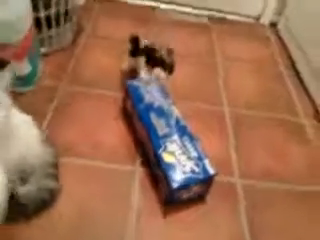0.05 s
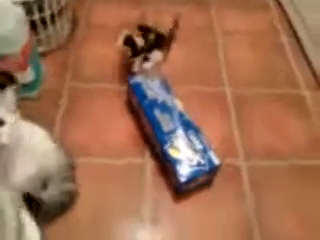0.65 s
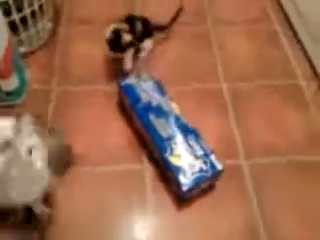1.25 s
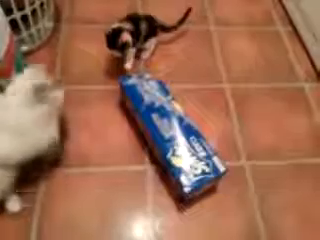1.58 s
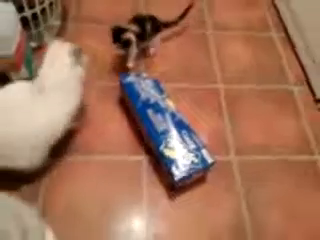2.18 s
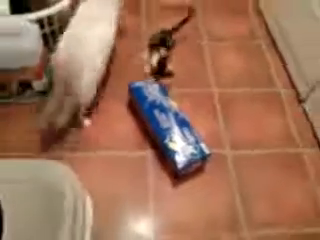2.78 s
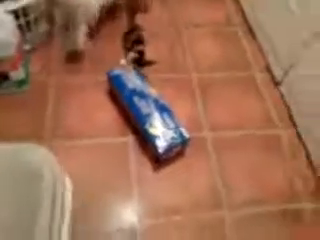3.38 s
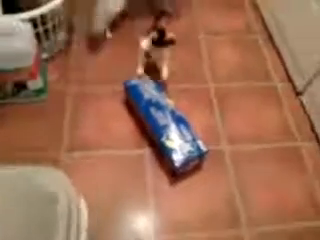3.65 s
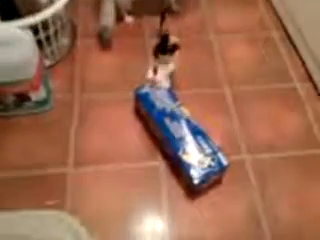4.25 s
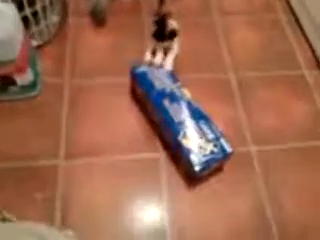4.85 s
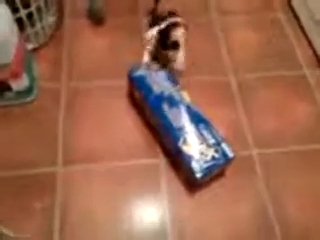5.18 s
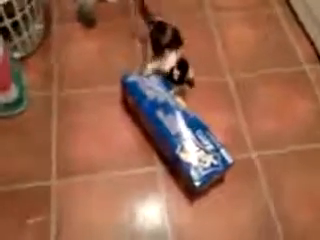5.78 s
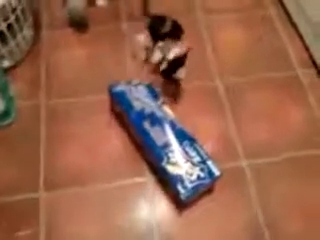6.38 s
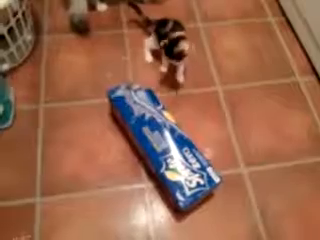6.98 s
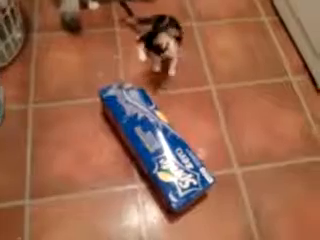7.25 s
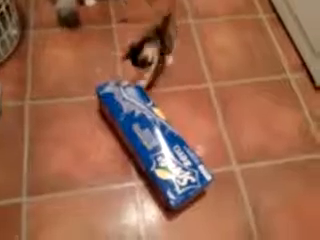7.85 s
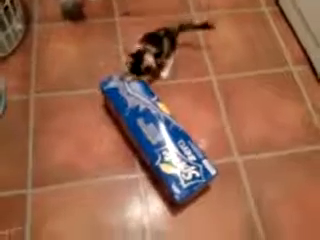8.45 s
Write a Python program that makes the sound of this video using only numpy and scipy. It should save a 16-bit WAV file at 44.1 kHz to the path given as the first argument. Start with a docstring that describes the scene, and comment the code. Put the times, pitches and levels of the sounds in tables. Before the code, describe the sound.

Claws scrape and snap on a hollow cardboard box as it slides and bumps over tile, above a low appliance hum.

```python
"""A kitten claws and bats an empty cardboard box on a tiled floor.
Claws stick and slip over the card; the hollow box slides, booms under each blow and thumps down,
and its flaps snap and rustle back. A bigger cat shuffles past, with a few faint squeaks and ticks.
The small hard room rings after each burst, over a low appliance hum and microphone hiss."""
import sys
import numpy as np
from scipy import signal
from scipy.fft import rfft, irfft
from scipy.io import wavfile
from scipy.ndimage import uniform_filter1d

SR = 44100
rng = np.random.default_rng(int(sys.argv[2]) if len(sys.argv) > 2 else 0)


def to_wav(sig):
    """Store sig (one row per channel, or 1-D mono) as 16-bit WAV at the path in sys.argv[1].

    Samples outside -1..1 are clipped; the rate is SR.
    """
    pcm = np.clip(np.atleast_2d(sig), -1, 1) * 32767
    pcm = np.round(pcm).astype(np.int16)
    wavfile.write(sys.argv[1], SR, pcm.T)  # frames by channels


N = 383669
HZ = np.fft.rfftfreq(N, 1 / SR)

# Cue levels are set ahead of the mix gains. Likeness is the correlation of left and right.
# Colour of the room tone: frequency_hz, level_db
AIR_COLOUR = [(20, -9), (44, -8), (88, -0.5), (130, -19), (180, 1), (220, -8), (250, -6), (315, -10.5),
              (465, -11), (530, -15.5), (1000, -27.5), (4000, -38.5), (10000, -29.5), (16000, -34.5)]
# Stereo image of the room tone: frequency_hz, likeness
AIR_LIKENESS = [(60, 0.63), (290, 0.78), (640, 0.23), (1400, 0.031), (3000, 0.059), (15000, 0.056)]
# Fader ride on the hiss, sinking in the pauses: time_s, gain_db
HISS_RIDE = [(1.4, 10.5), (1.65, 6), (1.9, 9), (4.1, 11.5), (6.301, 12.5), (6.498, 5), (6.75, 3),
             (6.9, 3.5), (7.2, 10.5)]
# Partials of the appliance hum: pitch_hz, level_db
HUM_PARTIALS = [(188.4, -82), (253.0, -73.5), (339.1, -78), (425.3, -76), (468.3, -77)]
# Strokes of claw on card and box on tile: crest_s, length_s, force_db, lean_db
# Positive lean rides the claw tips; negative lean digs into the box.
STROKES = [(0.045, 0.081, -51.5, 1), (0.211, 0.2, -47.5, -3.5), (0.306, 0.054, -51, 3.5),
           (0.629, 0.048, -60.0, -7), (0.737, 0.079, -66, -4.5), (0.874, 0.098, -51, 3),
           (0.935, 0.12, -43, 2), (1.164, 0.057, -73, 10), (1.3, 0.089, -60.5, -6.5),
           (3.088, 0.12, -57.5, -1), (3.177, 0.14, -40.5, 5.5), (3.348, 0.18, -42, -2),
           (3.4, 0.06, -28, -3.5), (3.484, 0.17, -43, -1), (3.587, 0.077, -49, -1), (3.827, 0.29, -61, 9.5),
           (4.229, 0.086, -42.5, -1.0), (4.355, 0.21, -39, -1), (4.533, 0.11, -30.5, 1.5),
           (4.663, 0.22, -42.5, -2.5), (4.905, 0.15, -54.5, 6), (5.013, 0.14, -55, 6.5),
           (5.086, 0.11, -34, -5.5), (5.195, 0.11, -39.5, 3.5), (5.284, 0.085, -47, -7.5),
           (5.442, 0.09, -45.5, -2.5), (5.691, 0.078, -53.5, 6), (5.888, 0.11, -49.0, -3),
           (6.011, 0.2, -49, 2.5), (6.286, 0.14, -45, 0), (7.11, 0.09, -75, 3), (7.34, 0.19, -63, 7.5),
           (7.907, 0.069, -36, 7.5), (7.95, 0.11, -34.5, 2), (8.002, 0.13, -37, -5),
           (8.04, 0.057, -32.5, -0.5), (8.087, 0.17, -30.5, 2), (8.212, 0.088, -41, 0),
           (8.312, 0.064, -55.5, 4.5), (8.497, 0.075, -58.5, 4), (8.602, 0.16, -58, 5)]
# Air and panel modes of the box: pitch_hz, level_db, t60_s
BOX_MODES = [(121.9, -8, 0.16), (219, -7, 0.12), (257, -13, 0.048), (340, -5, 0.073), (438.8, -4, 0.072),
             (502.4, 8, 0.019), (563, -9, 0.033), (637, -0.5, 0.06), (795, -2.5, 0.08), (1073, -14, 0.13),
             (1222, -24, .06), (1400, -19, 0.053), (1430, -0.5, 0.057), (1820, -16, 0.077)]
# Colour of cardboard: frequency_hz, level_db
CARD_COLOUR = [(40, -25), (120, -7.5), (230, -17), (330, -10.5), (600, -7.5), (900, -11.5), (1400, -14),
               (2000, -14), (2500, -19), (3200, -14), (5500, -17), (8900, -14.5), (13000, -23),
               (16000, -30.5)]
# Hollow blows of paw on box and box on tile: start_s, level_db, centre_hz, room_send_db
BLOWS = [(.013, -33.5, 405, 4.5), (0.129, -31.5, 517, -7), (.171, -17, 414.6, 1), (0.624, -45, 268, -1),
         (2.187, -46.5, 207, -1.5), (2.638, -44.5, 205, 1), (2.891, -48, 221, -2), (3.166, -37, 230, -5),
         (3.305, -19.5, 210, -3), (3.39, -19, 235, 2), (4.507, -10.5, 512, 2.5), (4.587, -20, 564, -7),
         (4.625, -9, 513, -6), (4.711, -20, 530, -1), (4.977, -22, 475, 2), (5.049, -9.5, 556, 2),
         (5.091, -12, 516, -4), (5.099, -28, 80, -4), (5.128, -21, 520, -0.5), (5.282, -38, 520, 0),
         (5.388, -26, 510, -2), (5.843, -28, 386, -1), (6.036, -21.5, 466, -11.5), (6.252, -24, 556, -12),
         (7.986, -16, 346, -3), (8.066, -1.5, 616, -6.5), (8.068, -13.5, 320, -0.5), (8.07, -18.5, 125, -6),
         (8.093, -17, 565, 2.5), (8.221, -33, 141, -5.5)]
# The box dropping back on the tile: start_s, level_db, centre_hz
LANDINGS = [(.014, -46, 140), (.174, -29.5, 200), (.875, -49, 130), (3.392, -29, 170), (4.51, -40, 120),
            (4.627, -37, 120), (5.092, -29, 55), (5.285, -44, 80), (8.065, -26, 120), (8.22, -38, 130)]
# Snaps of claws and flaps: start_s, level_db, centre_hz, give_way_s
CARD_SNAPS = [(0.171, -17, 1320, 0.00035), (0.875, -19.5, 2960, 0.00025), (2.641, -33, 5000, 0.00018),
              (3.105, -19.5, 8000, .0002), (3.305, -31.5, 2150, .0003), (3.361, -11.5, 3680, .0003),
              (3.394, -18, 3160, .0003), (3.943, -26.5, 2330, 0.00063), (4.199, -15.5, 1730, 0.0012),
              (4.296, -18, 2090, .002), (4.506, -13.5, 2370, .002), (4.584, -12.5, 4630, 0.00083),
              (4.625, -17, 4140, 0.00037), (4.707, -13, 5260, 0.0013), (4.914, -26.5, 10900, 0.0002),
              (5.051, -7, 4200, 0.0021), (5.385, -17, 1820, 0.00093), (5.517, -36.5, 6510, 0.00035),
              (5.842, -21, 1800, 0.00068), (5.967, -24, 2370, 0.0018), (6.222, -21.5, 1750, 0.0034),
              (6.294, -17.5, 2150, 0.0041), (7.986, -12, 1560, 0.00016), (8.022, -8, 1900, 0.0037),
              (8.063, -10, 1860, 0.00038), (8.476, -39, 4060, 0.00034)]
# Faint thin squeaks: start_s, length_s, first_hz, last_hz, width_hz, level_db
SQUEAK_GLIDES = [(.28, .52, 3240, 3130, 170, -70.5), (2.738, .23, 2965, 2700, 750, -66.5),
                 (2.87, .22, 2140, 2010, 260, -68.5), (7.059, .11, 1330, 1250, 260, -70.5),
                 (7.19, .06, 897, 780, 350, -66)]
# Small, close, dry taps: start_s, level_db, centre_hz, give_way_s
CLOSE_TICKS = [(1.07, -49, 2600, .0003), (2.55, -53, 6500, .0002)]
# Steps of the bigger cat: start_s, length_s, level_db
CAT_STEPS = [(1.92, 0.21, -71.5), (2.069, .2, -67), (2.223, 0.22, -75)]
# Colour of fur and pads on tile: frequency_hz, level_db
FUR_COLOUR = [(500, -16), (1000, -3), (1650, 0), (2300, 0), (2800, -11), (3350, -2), (4200, -14),
              (5100, -5), (6500, -27), (16000, -40)]
# Decay of the room: frequency_hz, t60_s
ROOM_DECAY = [(100, 0.32), (400, 0.29), (1000, 0.27), (3000, 0.28), (8000, 0.24), (15000, 0.33)]
# Stereo image of the reverb: frequency_hz, likeness
ROOM_LIKENESS = [(100, 0.85), (300, 0.91), (550, 0.53), (1000, -.1), (2000, -0.17), (5000, 0.016)]
# Pan of the action, band by band: frequency_hz, left_minus_right_db
PAN = [(100, -0.5), (250, 0), (500, -2.5), (1100, -4), (2000, -6.5), (4000, -1.5), (12000, 0.5)]


def amp(db):
    """Decibels to gain."""
    return 10 ** (np.asarray(db) / 20)


def unit_rms(x):
    """Scales a signal to rms 1."""
    return x / np.sqrt(np.mean(x ** 2) + 1e-20)


def curve(points, hz):
    """Reads a table along a log-frequency axis."""
    knots_hz, values = np.transpose(points)
    return np.interp(np.log(hz + 1), np.log(knots_hz + 1), values)


def add(mix, start_s, sound):
    """Lays a sound into the mix."""
    part = mix[max(round(start_s * SR), 0):][:len(sound)]
    part += sound[:len(part)]


def eq(x, gain):
    """Filters a signal by a gain per frequency."""
    return irfft(rfft(x) * gain, x.shape[-1])


def hump(hz, centre_hz, octaves):
    """A soft band-pass curve."""
    return 1 / np.sqrt(1 + (np.log2((hz + 1) / centre_hz) / octaves) ** 4)


def stereo_pair(a, b, likeness):
    """Blends two unrelated spectra into a left and right of the given likeness."""
    mid, side = np.sqrt((1 + likeness) / 2) * a, np.sqrt((1 - likeness) / 2) * b
    return np.array([mid + side, mid - side])


def wander(size, span):
    """Random drift at rms 1, smoothed over span points."""
    return unit_rms(uniform_filter1d(rng.standard_normal(size), size=span))


def room_tone(air_db=-64, crossover_hz=700, waver_hz=1.8):
    """The bed: room rumble, microphone hiss and the wavering hum of an appliance."""
    a, b = rfft(rng.standard_normal((2, N)))
    spectrum = stereo_pair(a, b, curve(AIR_LIKENESS, HZ)) * amp(curve(AIR_COLOUR, HZ))
    wash = unit_rms(irfft(spectrum, N))
    rumble = eq(wash, 1 / (1 + (HZ / crossover_hz) ** 4))
    hiss = (wash - rumble) * amp(np.interp(np.arange(N) / SR, *np.transpose(HISS_RIDE)))
    hum = np.zeros(N)
    for pitch_hz, level_db in HUM_PARTIALS:
        cycles = np.cumsum(pitch_hz + waver_hz * wander(N, 4000)) / SR
        hum += amp(level_db) * np.sqrt(2) * np.sin(2 * np.pi * cycles)
    return amp(air_db) * (rumble + hiss) + hum


def slips(size, per_s, spread_db):
    """Stick and slip: a spray of tiny clicks, some larger than the rest."""
    height = amp(spread_db * np.minimum(rng.exponential(1, size), 3))
    return height * rng.choice([-1., 1.], size) * (rng.random(size) < per_s / SR)


def box_ring(centre_hz, octaves, scatter_db, detune=.03):
    """The box rings once: the blow's place and softness weight the modes, the paw's weight detunes them."""
    t = np.arange(SR // 4) / SR
    hz, level_db, t60_s = np.transpose(BOX_MODES)[:, :, None]
    hz = hz * (1 + detune * rng.standard_normal(hz.shape))
    weight = hump(hz, centre_hz, octaves) * amp(scatter_db * rng.standard_normal(hz.shape))
    modes = np.sin(2 * np.pi * (hz * t + rng.random(hz.shape)))
    return (weight * amp(level_db - 60 * t / t60_s) * modes).sum(0)


def scrape(swell_s, fade_s, boom_hz, boom_db, rasp_db, fizz_db, edge_db=-18.5, judder_db=4, spot_db=2):
    """One stroke, cresting mid-buffer: slips boom in the box, rasp on the card, fizz at the claw tips."""
    size = SR // 2
    t, hz = (np.arange(size) - size // 2) / SR, np.fft.rfftfreq(size, 1 / SR)
    swell_db = edge_db * (t / np.where(t < 0, swell_s, fade_s)) ** 2
    force = amp(swell_db + judder_db * wander(size, 260))  # the claw catches and lets go
    card = amp(curve(CARD_COLOUR, hz) + spot_db * wander(len(hz), 220))  # each spot has its resonances
    low, high = 1 / (1 + (hz / 900) ** 6), 1 - 1 / (1 + (hz / 4000) ** 6)
    middle = (1 - low) * (1 - high)
    drag = slips(size, per_s=1500, spread_db=3.96)
    ring = unit_rms(signal.oaconvolve(drag, box_ring(boom_hz, octaves=.76, scatter_db=.85))[:size])
    rumble = unit_rms(eq(drag, card * np.sqrt(low) * hump(hz, boom_hz, octaves=1.04)))
    boom = unit_rms(.43 * ring + .57 * rumble)
    rasp = unit_rms(eq(slips(size, per_s=2200, spread_db=.5), card * np.sqrt(middle)))
    fizz = unit_rms(eq(slips(size, per_s=6000, spread_db=5.5), card * np.sqrt(high)))
    return force * (amp(boom_db) * boom + amp(rasp_db) * rasp + amp(fizz_db) * fizz)


def card_friction(firm_db=-35, firm_hz=394, octaves_per_db=.02, rustle_rise_s=.009, rustle_fade_s=.037):
    """Claws and tile scrape the card, and it rustles as it springs back from each snap."""
    out = np.zeros(N + SR)  # one second of pre-roll
    for crest_s, length_s, force_db, lean_db in STROKES:
        boom_hz = firm_hz * 2 ** (octaves_per_db * (force_db - firm_db))  # a harder push booms higher
        rasp_db = force_db + 3 - abs(lean_db)  # a level claw rasps most
        stroke = scrape(.58 * length_s, .42 * length_s, boom_hz,
                        boom_db=force_db - lean_db, rasp_db=rasp_db, fizz_db=force_db + lean_db)
        add(out, 1 + crest_s - len(stroke) / 2 / SR, stroke)
    for start_s, snap_db, centre_hz, _ in CARD_SNAPS:
        lean_db = 3 * np.log2(centre_hz / 3600)  # a bright snap leaves fizz, a dull one some boom
        rustle = scrape(rustle_rise_s, rustle_fade_s, firm_hz, boom_db=snap_db - 29.5 - lean_db,
                        rasp_db=snap_db - 26, fizz_db=snap_db - 27 + lean_db)
        add(out, 1 + start_s + rustle_rise_s - len(rustle) / 2 / SR, rustle)
    return out[SR:]


def crackle(centre_hz, octaves, decay_s):
    """Tiny fractures in card, played as a fast-dying band of noise."""
    t = np.arange(SR // 4) / SR
    hz = np.fft.rfftfreq(len(t), 1 / SR)
    burst = eq(rng.standard_normal(len(t)), hump(hz, centre_hz, octaves) * amp(curve(CARD_COLOUR, hz)))
    return unit_rms(burst) * np.exp(-t / decay_s)


def even_attack(x):
    """Scales a hit so its first 5 ms have rms 0.5."""
    return x / (2 * np.sqrt(np.mean(x[:SR // 200] ** 2)))


def bumps(chatter_cycles=2.5, panel_cycles=3.6, sag=.15, sag_s=.0052, attack_s=.0012):
    """Blows swing a panel, ring the hollow box and set loose flaps chattering: dry bus and room send."""
    direct, send = np.zeros((2, N))
    for start_s, level_db, hz, send_db in BLOWS:
        ring = box_ring(hz, octaves=.36, scatter_db=1.4)
        chatter = crackle(hz, octaves=1, decay_s=chatter_cycles / hz)
        t = np.arange(len(ring)) / SR
        cycles = np.cumsum(hz * (1 + sag * np.exp(-t / sag_s))) / SR  # starts sharp, sinks as it relaxes
        panel = np.sin(2 * np.pi * cycles) * np.exp(-cycles / panel_cycles)
        body = amp(-3) * (panel + even_attack(ring)) + amp(-3.5) * even_attack(chatter)
        blow = amp(level_db) * body * (1 - np.exp(-t / attack_s))
        add(direct, start_s, blow)
        add(send, start_s, amp(send_db) * blow)
    return direct, send


def thumps(rise_s=.003, fade_s=.026):
    """The weight of the box lands on the tile: a short, dull shudder without a ring."""
    out, t = np.zeros(N), np.arange(SR // 4) / SR
    hz = np.fft.rfftfreq(len(t), 1 / SR)
    envelope = (1 - np.exp(-t / rise_s)) * np.exp(-t / fade_s)
    for start_s, level_db, centre_hz in LANDINGS:
        shudder = eq(rng.standard_normal(len(t)), hump(hz, centre_hz, octaves=.7) ** 2)
        add(out, start_s, amp(level_db) * unit_rms(shudder) * envelope)
    return out


def snaps(cues, octaves, tail_s):
    """A claw or crease lets go: a crack and a crackling tail, or a soft crunch if it gives way slowly."""
    out = np.zeros(N)
    for start_s, level_db, centre_hz, give_way_s in cues:
        tail = crackle(centre_hz, octaves, decay_s=tail_s + give_way_s)
        crack = amp(1) * crackle(centre_hz, octaves, decay_s=.0005)
        onset = 1 - np.exp(-np.arange(len(tail)) / SR / give_way_s)
        add(out, start_s, amp(level_db) * (crack + tail) * onset)
    return out


def arch(length_s):
    """A smooth swell and fade."""
    return np.sin(np.linspace(0, np.pi, round(length_s * SR)))


def squeaks():
    """Thin, fuzzy tones that sink a little as they swell and fade."""
    out = np.zeros(N)
    for start_s, length_s, first_hz, last_hz, width_hz, level_db in SQUEAK_GLIDES:
        swell = arch(length_s)
        offset_hz = np.fft.fftfreq(len(swell), 1 / SR)
        a, b = rng.standard_normal((2, len(swell)))
        fuzz = np.fft.ifft((a + 1j * b) / (1 + (2 * offset_hz / width_hz) ** 2))
        cycles = np.cumsum(np.linspace(first_hz, last_hz, len(swell))) / SR
        tone = (fuzz * np.exp(2j * np.pi * cycles)).real  # narrow noise riding the glide
        add(out, start_s, amp(level_db) * swell * unit_rms(tone))
    return out


def shuffles():
    """The bigger cat's fur and soft pads brush over the tile."""
    out = np.zeros(N)
    for start_s, length_s, level_db in CAT_STEPS:
        swell = arch(length_s)
        hz = np.fft.rfftfreq(len(swell), 1 / SR)
        brush = eq(slips(len(swell), per_s=1800, spread_db=3), amp(curve(FUR_COLOUR, hz)))
        add(out, start_s, amp(level_db) * swell * unit_rms(brush))
    return out


def echoes(per_s=4000, early_s=.022):
    """Dense stereo reflections off tile and walls, each band dying at its own speed."""
    taps = rng.standard_normal((2, SR // 2)) * (rng.random((2, SR // 2)) < per_s / SR)
    hz, frame_s, bands = signal.stft(taps, SR, nperseg=512)
    decay = amp(-60 * frame_s / curve(ROOM_DECAY, hz)[:, None])
    bands = stereo_pair(*bands, curve(ROOM_LIKENESS, hz)[:, None]) * decay
    tail = signal.istft(bands, SR, nperseg=512)[1]
    t = np.arange(tail.shape[1]) / SR
    onset = np.clip(t / .001 - .5, 0, 1)
    tail = tail * onset * (1 + np.exp(-t / early_s))  # floor and near walls answer first
    return tail / np.linalg.norm(tail[0])


def reverb(send, spots, blend_samples):
    """Sound leaves from ever-changing spots on the box, each with its own echo pattern."""
    shares = rng.standard_normal((spots, N))
    for _ in range(2):
        shares = uniform_filter1d(shares, size=blend_samples, axis=1)
    shares = shares / np.linalg.norm(shares, axis=0)
    return sum(signal.oaconvolve((share * send)[None], echoes(), axes=1)[:, :N] for share in shares)


def scene(low_cut_hz=70):
    """The play at the box, a little to the right, over the room tone."""
    friction = card_friction()
    bump, bump_send = bumps()
    snap = snaps(CARD_SNAPS, octaves=.96, tail_s=.0034)
    faint = squeaks() + shuffles()
    thump = thumps()
    ticks = snaps(CLOSE_TICKS, octaves=.65, tail_s=.0018)
    hits = amp(-3.5) * bump + amp(-2.5) * thump + amp(-11) * snap + amp(9) * ticks
    direct = amp(-6.5) * (friction + faint) + hits
    wet = reverb(amp(1) * friction + amp(-3) * snap + faint, spots=8, blend_samples=420)
    wet += reverb(amp(-1.5) * bump_send, spots=2, blend_samples=2200)
    stereo = np.array([np.roll(direct, 2), direct]) + wet  # the right side hears it first
    # A small box gives off little deep bass.
    low_cut = (HZ / low_cut_hz) ** 2 / np.sqrt(1 + (HZ / low_cut_hz) ** 4)
    pan = amp(np.array([[.5], [-.5]]) * curve(PAN, HZ))
    return eq(stereo, low_cut * pan) + room_tone()


def record(dry, high_cut_hz=15900):
    """A steep high cut on the master."""
    lowpass = signal.firwin(511, high_cut_hz, window=("kaiser", 9), fs=SR)
    return signal.oaconvolve(dry, lowpass[None], "same")


dry = scene()
out = record(dry)
to_wav(out)
```